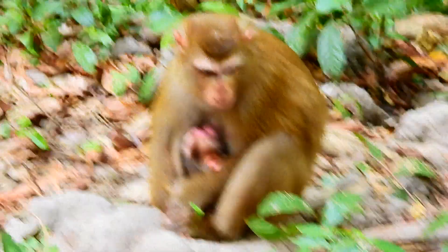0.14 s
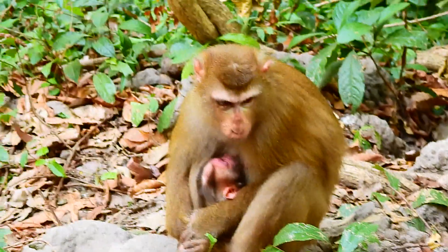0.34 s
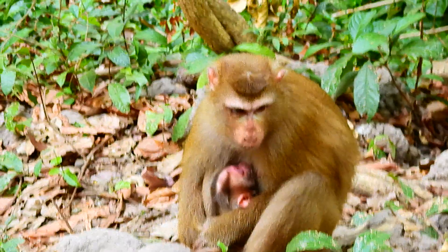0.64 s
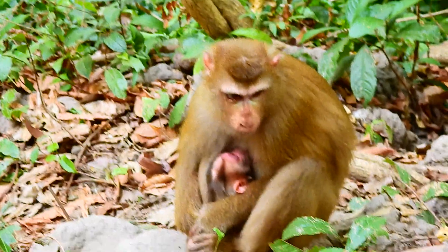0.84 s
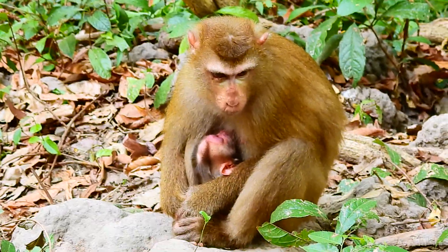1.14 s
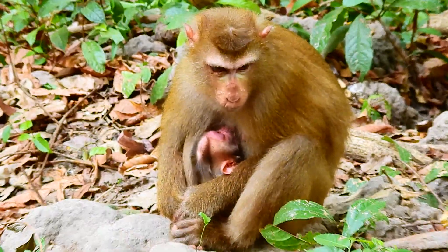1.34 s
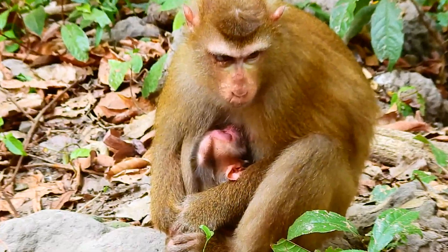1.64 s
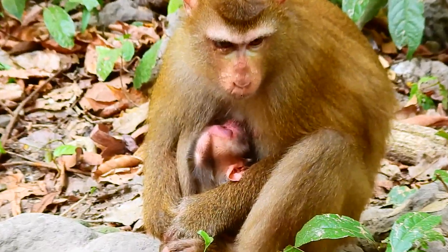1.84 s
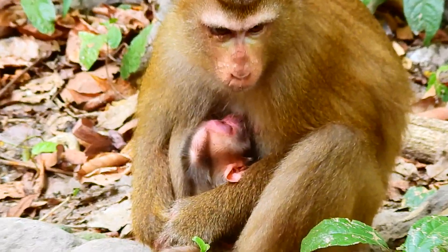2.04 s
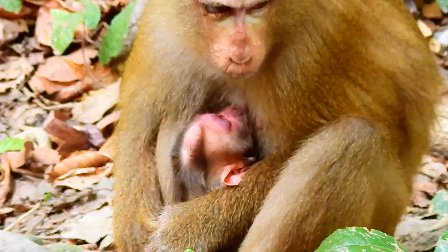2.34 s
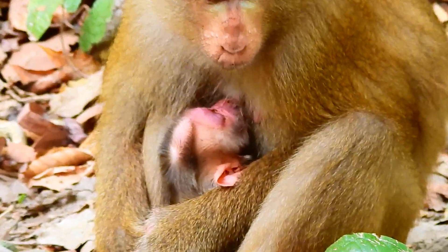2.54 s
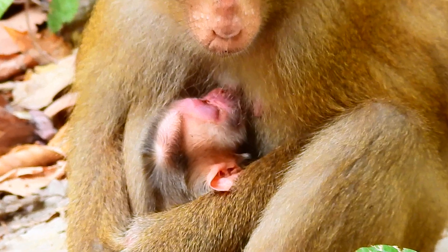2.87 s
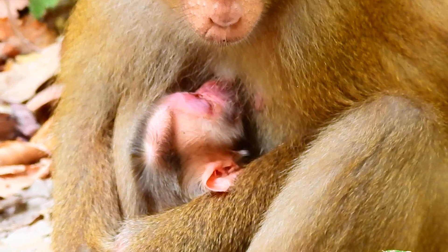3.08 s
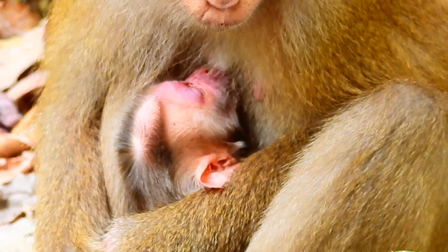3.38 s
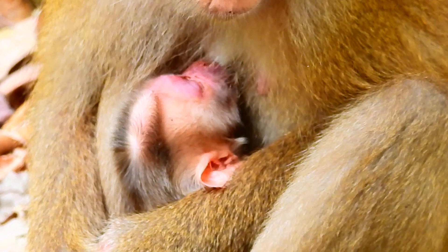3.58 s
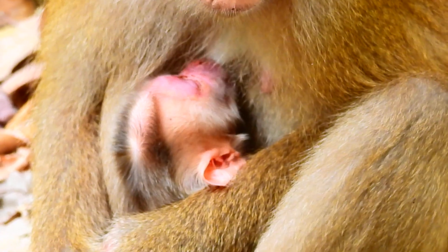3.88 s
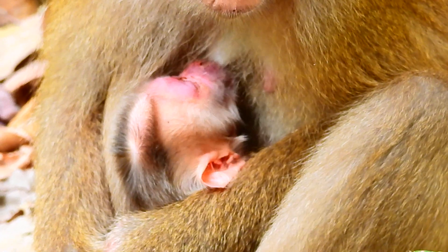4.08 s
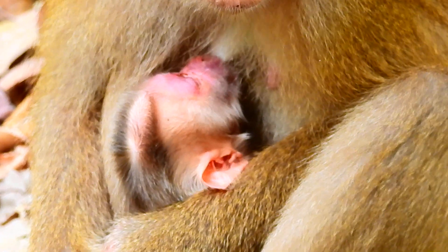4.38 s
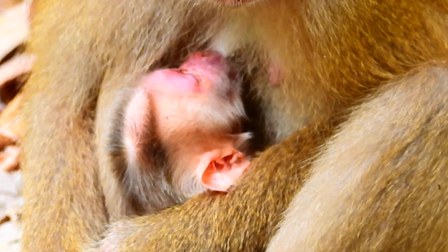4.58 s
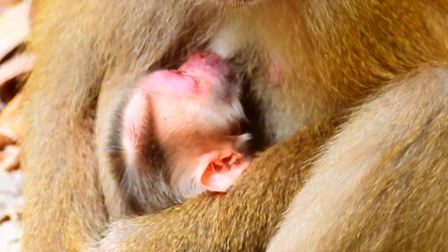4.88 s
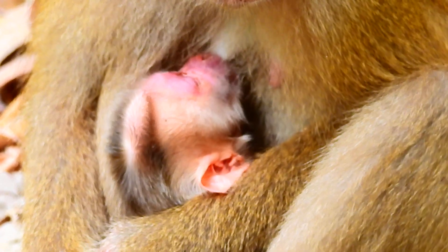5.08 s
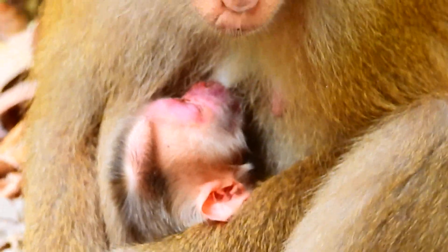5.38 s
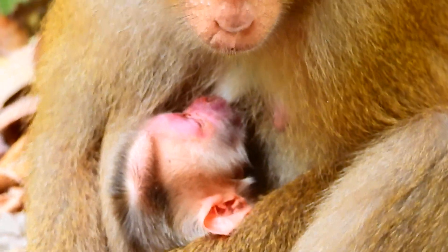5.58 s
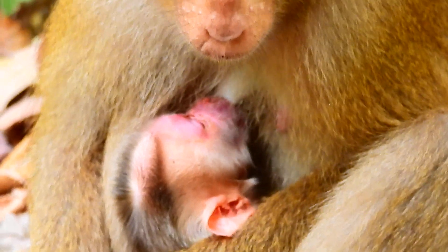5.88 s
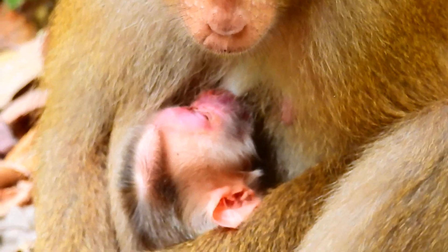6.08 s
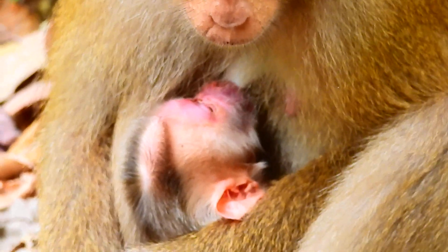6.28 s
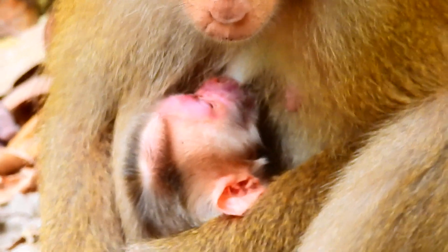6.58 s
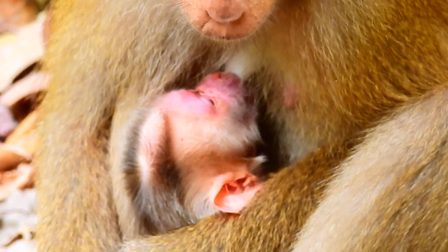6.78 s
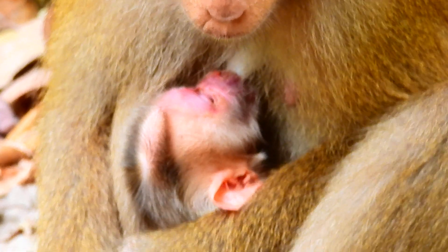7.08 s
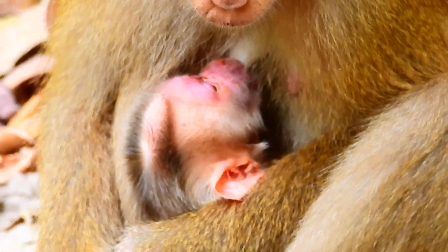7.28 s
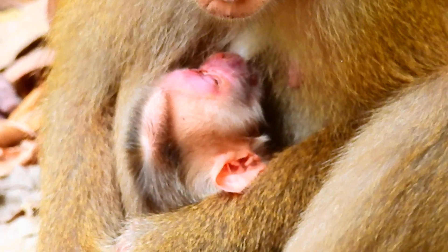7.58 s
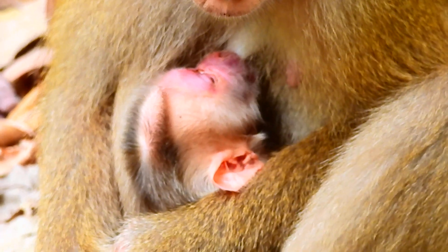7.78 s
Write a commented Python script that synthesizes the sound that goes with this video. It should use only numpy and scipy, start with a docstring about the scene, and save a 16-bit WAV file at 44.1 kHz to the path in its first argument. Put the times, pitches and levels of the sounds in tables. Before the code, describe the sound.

A few sharp clicks and finger rubs sound on the plastic body of a hand-held camera. Its zoom motor then grinds and whines for nearly three seconds, with a loud click near the end. The motor runs again briefly, a thumb slides across the casing, and scattered taps follow. Everything is very close, carried through the body into the built-in microphones, over a faint outdoor hiss.

```python
"""A zoom motor whines and grinds through the plastic shell of a hand-held camera, over a quiet outdoor hiss.
Fingers, the zoom lever and the starting and stopping gears tap the same shell; a thumb slides across it
once; two taps crack through the air. The shell rings in five families of modes, from thud to tick, and
reaches two built-in microphones partly alike (mid) and partly opposed (side)."""
import sys
import numpy as np
from scipy import signal
from scipy.fft import rfft, irfft
from scipy.io import wavfile
from scipy.ndimage import uniform_filter1d

SR = 44100
rng = np.random.default_rng(int(sys.argv[2]) if len(sys.argv) > 2 else 0)


def to_wav(sig):
    """Store sig (one row per channel, or 1-D mono) as 16-bit WAV at the path in sys.argv[1].

    Samples outside -1..1 are clipped; the rate is SR.
    """
    pcm = np.clip(np.atleast_2d(sig), -1, 1) * 32767
    pcm = np.round(pcm).astype(np.int16)
    wavfile.write(sys.argv[1], SR, pcm.T)  # frames by channels


N = 349386
TIME = np.arange(N) / SR


def undb(db):
    """Gain of a dB value."""
    return 10 ** (np.asarray(db) / 20)


def unit(x):
    """Scaled to rms 1."""
    return x / np.sqrt(np.mean(x ** 2))


def walk(per_s):
    """Random drift, gliding between per_s values a second; rms 1."""
    k = int(SR / per_s)
    return unit(uniform_filter1d(np.repeat(rng.standard_normal(N // k + 1), k), k)[:N])


def gate(start_s, stop_s, edge_s):
    """1 between two times, with straight fades."""
    return np.clip(np.minimum(TIME - start_s, stop_s - TIME) / edge_s + .5, 0, 1)


def band(hz, width_hz):
    """Coefficients of a resonant band-pass."""
    return signal.iirpeak(hz, hz / width_hz, SR)


def shell(family, favoured_hz=()):
    """Mid and side ring of one mode family, each of unit energy; modes near favoured_hz stand out."""
    # The shell's modes by family. Each mode: pitch and width in Hz, relative mid and side levels in dB.
    modes = [
        [(203.8, 324, 6.5, 1.5), (335.5, 46, 0.5, -8)],
        [(461.5, 180, 1.5, -29), (576, 37.5, 3.5, -13), (698, 1000, 4, -5.5)],
        [(978.6, 34, -1, -8), (1075, 48, 1, -15.5), (1231, 50, 4.5, -12), (1419, 57, -0.5, -11),
         (1630, 130, -1.5, -33)],
        [(1783, 22, -0.5, -13.5), (1890, 150, 2.5, -16.5), (2220, 85, 2.5, -22), (2569, 53, -2.5, -19.5),
         (3085, 290, -2.5, -22)],
        [(3435, 80, 0.5, -16), (4420, 420, 4, -6.5), (5590, 150, 8, -8), (6120, 200, 6, -11),
         (6660, 300, 5, -4), (7470, 190, 2, -8), (8040, 280, -3, -15), (9370, 1100, -4, -16),
         (12300, 500, -62, -38)],
    ]
    hz, width, *db = np.transpose(modes[family])
    db = np.array(db) + 14 * sum(np.exp(-(np.log2(hz / f) / .25) ** 2) for f in favoured_hz)
    t = np.arange(2048)[:, None] / SR
    # neighbours alternate in sign; side is a quarter cycle off mid
    phase = np.pi * (np.arange(len(hz)) + np.array([[[0]], [[.5]]]))
    decay = undb(db) * np.sqrt(width)
    decay = decay[:, None] * np.exp(-np.pi * width * t)
    answer = (decay * np.sin(2 * np.pi * hz * t + phase)).sum(2)
    edges_hz = [.87 * hz[0], 1.2 * hz[-1]]
    answer = signal.sosfilt(signal.butter(4, edges_hz, "band", fs=SR, output="sos"), answer)
    return answer / np.sqrt((answer ** 2).sum(1, keepdims=True))


def ring(force, family):
    """A running force heard through one family of modes."""
    return signal.oaconvolve(force[None], shell(family), axes=1)[:, :N]


def hiss():
    """Air and electronics hiss; in the side, a wavering hum at 690 Hz and the low shell modes."""
    # The colour of the hiss. Each row: frequency in Hz, relative density in dB.
    colour = [(35, -54), (100, -10), (144, -15), (190, -10), (317, -5), (408, -5), (633, -8), (5430, -20),
              (11100, -33), (15000, -71)]
    hz, db = np.transpose(colour)
    shape = undb(np.interp(np.log(np.fft.rfftfreq(N, 1 / SR) + 1), np.log(hz), db))
    noise = unit(irfft(rfft(rng.standard_normal((2, N))) * shape, N)) * undb(-65.5 + .5 * walk(6.8))
    hum = unit(signal.lfilter(*band(690, 22), rng.standard_normal(N)))
    low_modes = unit(ring(rng.standard_normal(N), 1)[1] + ring(rng.standard_normal(N), 0)[1])
    noise[1] += undb(-66.5 + 4.9 * walk(1.5)) * (hum + .59 * low_modes)
    return noise


def grip():
    """Stick-slip grains of skin stir the shell; the sliding thumb adds its own rasp."""
    # Fingers pressing or shifting. Each row: start and stop in seconds, level in dB,
    # change in dB per second, brightness in dB per two families.
    presses = [(0.104, 0.199, -48, -102, -6), (0.206, 0.405, -53.5, -51, -8), (0.63, 0.911, -68, 19.5, -2),
               (4.157, 4.224, -68, -150, 9), (4.986, 5.13, -42.5, -83, -17),
               (6.254, 6.301, -45, -150, -7.5), (6.307, 6.622, -70, 2, -3), (6.831, 7.347, -69.5, -1, -1)]
    # How skin drives the shell. Each row is a family: mid and side gain in dB.
    skin = [(-4, 3.5), (-3.5, 0), (-0.5, 1), (-3, -4.5), (-30, -27)]
    # The thumb pad's rasp. Each row: centre and width in Hz, gain in dB.
    rasp_bands = [(885, 490, 2), (579, 94, 4.5), (1920, 230, -0.5), (4900, 2000, -5.5)]
    edge_s, lumps_db = .012, 2.2
    thumb = gate(5.09, 5.345, edge_s) * undb(np.interp(TIME, (5.09, 5.21, 5.345), (-59, -55, -63)))
    touches = [(gate(start, stop, edge_s) * undb(db + slope * np.clip(TIME - start, 0, stop - start)),
                bright_db) for start, stop, db, slope, bright_db in presses]
    grains = unit(rng.standard_normal(N) * undb(1.6 * walk(300)))
    rub = rasp = 0
    for family, db in enumerate(skin):
        force = thumb + sum(level * undb(bright_db * family / 2) for level, bright_db in touches)
        rub += undb(db)[:, None] * ring(grains * force * undb(lumps_db * walk(60)), family)
    for hz, width, db in rasp_bands:
        level = undb(db + lumps_db * walk(40))
        rasp += level * unit(signal.filtfilt(*band(hz, width), rng.standard_normal((2, N))))
    return rub + rasp * thumb


def taps():
    """Each contact is a short rough push on the shell; loose parts chatter faintly after it."""
    # Taps on the shell. Each row: start in seconds, place, contact time in ms, level in dB,
    # brightness in dB gained from one family to the next.
    contacts = [(0.123, "snap", 1.23, -45, 1.5), (0.14, "base", 7.2, -49.5, 6.5),
                (0.2127, "base", 0.66, -44.5, 1.5), (0.293, "catch", 3.8, -70.5, -11),
                (0.536, "palm", 3.4, -63, 0.5), (0.7047, "lever", 4.34, -45, -5),
                (0.776, "palm", 0.97, -55.5, 1.5), (0.8251, "lever", 0.39, -48.5, -1.7),
                (0.889, "lever", 0.59, -63.5, 3.5), (0.93, "barrel", 26, -47.5, 0),
                (0.95, "catch", 9.3, -65, 8), (1.0104, "base", 3.9, -44.5, -5),
                (2.17, "palm", 27.5, -58.5, -1.5), (2.321, "palm", 27, -60.5, -1.5),
                (2.539, "palm", 21, -58.5, 0), (2.5, "nail", 0.36, -77, 4.5),
                (3.032, "barrel", 7.2, -56, -4), (3.455, "lever", 1.8, -54, -0.5),
                (3.4977, "lever", 1.5, -29, -2.2), (3.661, "gear", 18.5, -50.5, -3.3),
                (3.684, "base", 42, -55, 0), (4.147, "palm", 8.1, -55, -1), (4.187, "lever", 1.93, -44, -1),
                (4.299, "barrel", 8.3, -53.5, -1), (4.323, "palm", 6.4, -54, 0),
                (4.3782, "nail", 1.8, -66, -1.5), (4.4229, "lever", 3.6, -46.5, -4),
                (4.631, "gear", 16, -47, -3), (4.645, "base", 15, -47, 1), (5.0014, "barrel", 1.6, -49, -5),
                (5.0759, "barrel", 0.94, -47.5, -0.5), (5.1085, "barrel", 1.9, -44, 5),
                (5.632, "palm", 8.2, -64, -2), (6.168, "edge", 0.68, -70, -4.5),
                (6.2681, "edge", 2.08, -37, 0.5), (6.371, "catch", 2.4, -74, 0.5),
                (6.4848, "barrel", 2.4, -41, 2), (6.5357, "nail", 0.86, -68, 1.5),
                (6.848, "catch", 1.9, -69, 1), (6.8922, "nail", 0.88, -70.5, 0.5),
                (6.966, "catch", 5, -65, -7), (7.0067, "barrel", 9.9, -68.5, -8),
                (7.0476, "nail", 2.3, -72.5, 0), (7.141, "nail", 2.3, -72.5, -1),
                (7.178, "nail", 13, -58, -1.5), (7.297, "edge", 0.58, -72, -5.5),
                (7.3369, "nail", 0.67, -73.5, 0.5), (7.5354, "catch", 0.5, -60.5, -6)]
    # The tone of each place. Each row: five family mid gains in dB, twist in dB (weighted by
    # family to lift side over mid), then the frequencies it favours in Hz.
    places = {"palm": (3, -27, -7, -12, -39, 4, 217, 2210), "base": (0, -8, -13, -19.5, -40, 3, 302, 1230),
              "lever": (-11.5, -21.5, 0.5, -1.5, -19, -1, 1279, 2145, 2557, 4328),
              "edge": (-6.5, -1, 1.5, -14.5, -25.5, 0.5, 470, 1420, 1588),
              "barrel": (-5, 1, -4, -14.5, -30.5, 2, 324, 563, 1003),
              "gear": (-10, -4, 2.5, -4.5, -15, 12, 329, 1034),
              "catch": (-21.5, -6, 10, 6.5, -15, 4, 1246, 2190),
              "snap": (2.5, -2, 0, -6.5, -16, 3, 327, 1383, 1946), "nail": (-12, 1, 7, 9, 4.5, 8.5, 4502)}
    # Places where the hand stays on and stills the ring, each with its decay time in ms.
    damped_ms = {"edge": 10, "snap": 6, "barrel": 20, "lever": 13, "nail": 12}
    rattle_ms, rattle_db = 11.5, -22
    clean_ms = 1.35  # shorter contacts knock more than they scrape
    out = np.zeros((2, N + 8192))
    t = np.arange(2048) / SR
    answers = {place: np.array([shell(family, row[6:]) for family in range(5)])
               * np.exp(-1000 * t / damped_ms.get(place, np.inf)) for place, row in places.items()}
    for start, place, contact_ms, level_db, bright_db in contacts:
        rise = t * 3000 / contact_ms
        rattle = undb(rattle_db) * np.minimum(rise, 1) * np.exp(-1000 * t / rattle_ms)
        push = rise * np.exp(1 - rise) + rattle
        force = rng.standard_normal(2048) * push
        force[np.argmax(push)] += clean_ms / contact_ms * np.linalg.norm(force)  # the clean knock
        rung = signal.fftconvolve(answers[place], force[None, None], axes=2)
        rung *= np.sqrt(SR / 50 / (rung ** 2).sum(2, keepdims=True))  # levels are energy over 20 ms
        *place_db, twist_db = places[place][:6]
        mid_db = level_db + np.array(place_db) + bright_db * np.arange(-2, 3)
        # twisting the shell opposes the capsules, least in the top family
        side_db = mid_db + twist_db * np.array([.64, .66, 1, .88, .1]) + [4.5, 4, -3, -10, 1.5]
        i = int(start * SR)
        out[:, i:i + rung.shape[2]] += (undb([mid_db, side_db]).T[:, :, None] * rung).sum(0)
    return out[:, :N]


def cracks():
    """Two taps also cross the air as bright snaps of noise, nearer the right capsule."""
    # Each row is a crack: start in seconds, peak level in dB before filtering.
    snaps = [(0.123, -47), (3.497, -40)]
    decay_ms, left_db = 3.2, -17
    envelope = sum(undb(db) * np.exp(-1000 * np.where(TIME < start, np.inf, TIME - start) / decay_ms)
                   for start, db in snaps)
    treble = signal.butter(2, (7560, 12800), "band", fs=SR, output="sos")
    return undb([[left_db], [0]]) * signal.sosfilt(treble, envelope * rng.standard_normal(N))


def gear_whine(angle):
    """Gear teeth and commutator sing at multiples of the shaft speed, each tone wavering."""
    # Each row is a tone: multiple of the shaft speed, relative mid and side levels in dB.
    tones = [(12, -1, -9), (13, -9, -14), (15, -6, -5), (25, -4, -16), (26, -7, -18), (27, 1, -17),
             (30, -14, -13), (33.5, -14, -20), (44.5, -11, -11), (49, -10, -21), (50, -12, -21)]
    # The lowest tone swells under load. Each row: time in seconds, gain in dB.
    swell = [(1.5, 5.5), (1.9, -1.5), (2.25, 2), (2.5, 2.5), (2.92, 10)]
    strain = undb(np.interp(TIME, *np.transpose(swell)) + 2.5 * walk(60))
    phase = np.array([[0], [np.pi / 2]])
    whine = 0
    for multiple, mid_db, side_db in tones:
        level = undb([[mid_db], [side_db]]) * undb(2.4 * walk(22.11))
        whine += level * np.sin(multiple * angle + phase) * (strain if multiple == tones[0][0] else 1)
    return whine


def motor():
    """Friction throbs with the shaft and rings the shell; the brushes hiss, and at speed the gears sing."""
    # Runs of the motor. Each row: start and stop in seconds, then grind, brush hiss and starting surge in dB.
    drives = [(0.94, 1.048, -56.5, -72.5, 7.5), (1.04, 1.37, -55.5, -102, 2.5),
              (1.323, 3.062, -50, -65, 1.5), (3.035, 3.651, -51.5, -68, -0.5),
              (4.304, 4.65, -52.5, -70.5, 5)]
    # The fast zoom. Each row: time in seconds, shaft speed in turns per second.
    fast_zoom = [(1.33, 46.6), (1.49, 45.9), (1.58, 46.2), (1.8, 45), (1.95, 46), (2.24, 46), (2.56, 46.5),
                 (2.7, 44.6), (2.84, 45.5), (3.07, 45.3)]
    # Depth of the friction swell once, twice and three times a turn.
    throb_depths = [.1, .12, .1]
    # How the grind drives the lower four families. Each row: mid and side gain in dB.
    mount = [(-12.5, -8.5), (-7.5, -8.5), (-6.5, -4.5), (-13, -11.5)]
    slow_hz, wander, surge_s, whine_db = 23.86, .0025, .14, -8
    runs = 0
    for start, stop, grind_db, brush_db, surge_db in drives:
        surge = surge_db * np.exp(-np.maximum(TIME - start, 0) / surge_s)
        runs += gate(start, stop, edge_s=.048) * undb(np.array([[grind_db], [brush_db]]) + surge)
    load, brush_level = runs
    times, fast_hz = np.transpose(fast_zoom)
    fast = (TIME > times[0]) & (TIME < times[-1])
    speed = np.where(fast, np.interp(TIME, times, fast_hz), slow_hz) * (1 + wander * walk(14))
    angle = 2 * np.pi * np.cumsum(speed) / SR
    throb = unit(np.exp(sum(depth * np.cos(k * angle + k) for k, depth in enumerate(throb_depths, 1))))
    friction = throb * rng.standard_normal(N)
    grind = sum(undb(db)[:, None] * ring(friction * load * undb(.7 * walk(10)), family)
                for family, db in enumerate(mount))
    grind -= 1.6 * signal.lfilter(*band(1473, 130), grind)  # the mount stirs the shell less here
    brushes = ring(friction * brush_level, family=4)
    at_speed = uniform_filter1d(1. * fast, size=800)
    return grind + brushes + gear_whine(angle) * load * undb(whine_db) * at_speed


def scene():
    """Mid and side spread to left and right, with the airborne cracks on top."""
    mid, side = taps() + motor() + grip() + hiss()
    return np.array([mid + side, mid - side]) + cracks()


def record(dry):
    """The microphone housing dips near 4 kHz; the recorder cuts wind rumble and the top."""
    x = dry - .6 * signal.lfilter(*band(3980, 250), dry)
    x = signal.sosfilt(signal.butter(2, 140, "high", fs=SR, output="sos"), x)
    return signal.sosfilt(signal.ellip(8, .2, 70, 15900, fs=SR, output="sos"), x)


dry = scene()
out = record(dry)
to_wav(out)
```